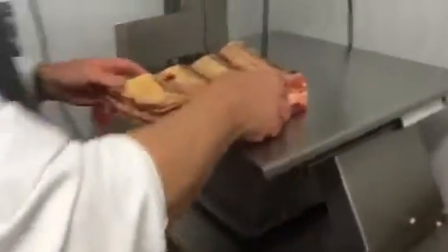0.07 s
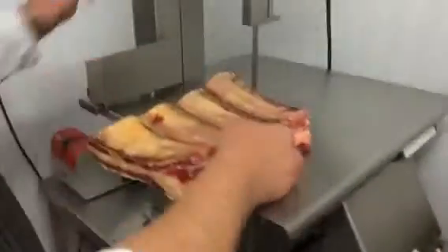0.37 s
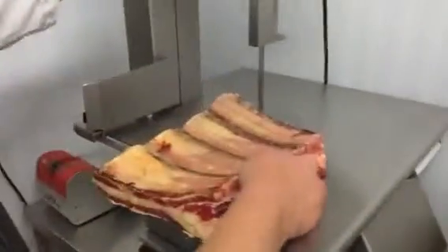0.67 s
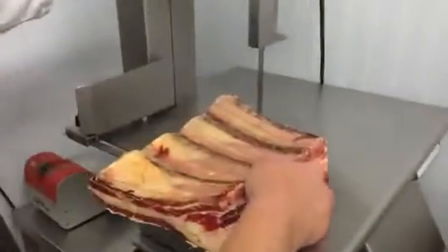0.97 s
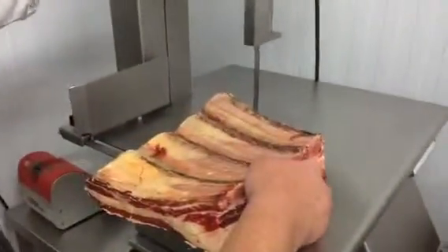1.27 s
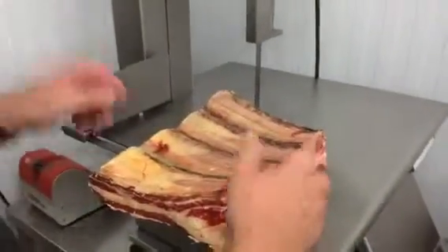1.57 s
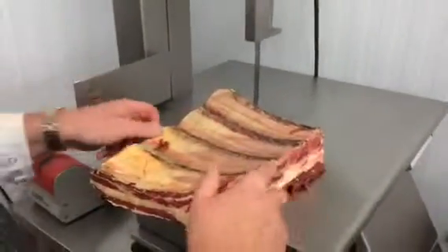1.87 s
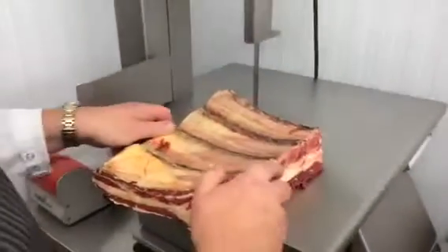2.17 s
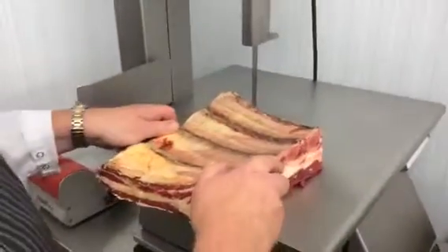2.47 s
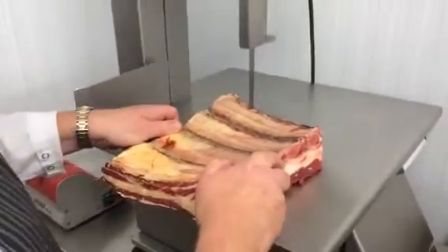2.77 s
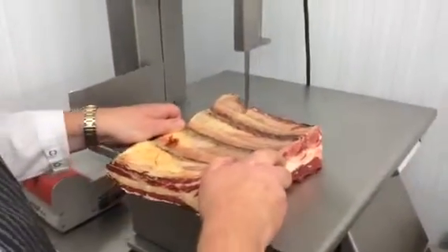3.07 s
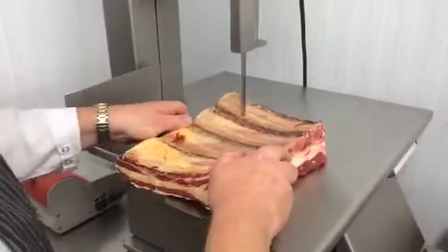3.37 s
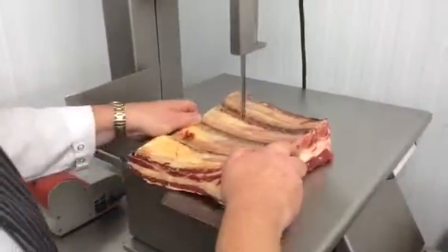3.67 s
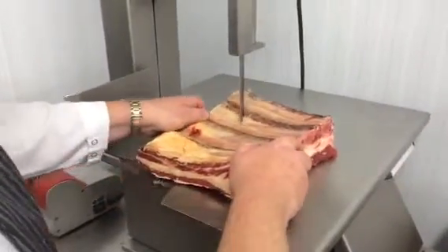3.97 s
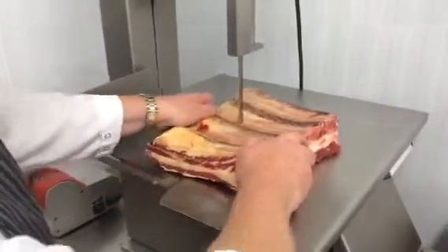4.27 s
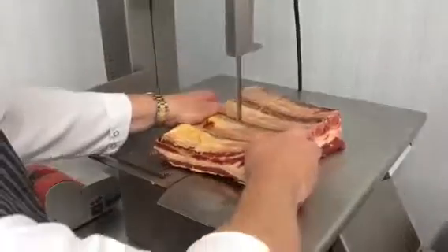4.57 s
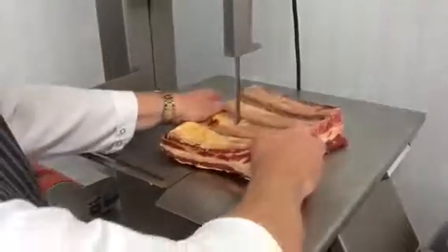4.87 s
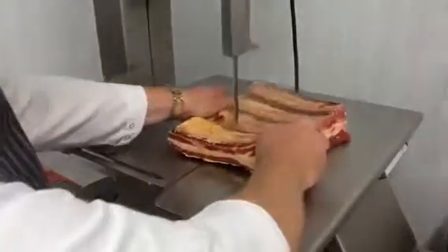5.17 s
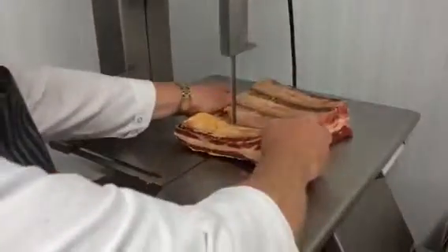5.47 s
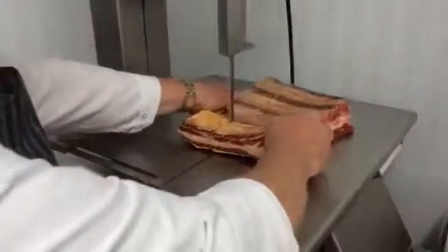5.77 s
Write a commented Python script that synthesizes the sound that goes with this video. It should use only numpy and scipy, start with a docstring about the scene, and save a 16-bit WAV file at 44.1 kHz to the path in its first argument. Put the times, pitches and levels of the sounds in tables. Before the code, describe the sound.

After a few soft knocks, a meat bandsaw starts up and saws through rib bones with a harsh rasp and high squeals.

```python
"""A butcher's bandsaw in a small hard-walled room, heard from close by. A cooling unit hums while a sleeve
brushes the meat and a rack of ribs knocks on the steel table. The starter clacks in, the motor runs up,
and the band shakes the sheet-steel frame, rattles the covers and hisses by friction in its guides.
Then the teeth meet the ribs: the band rasps, and stick-slip in the bone makes it squeal, its note
flipping between overtones. Around some squeals the hiss, fizz and weaker overtones dip briefly."""
import sys
import numpy as np
from scipy import signal
from scipy.fft import rfft, irfft, next_fast_len
from scipy.io import wavfile
from scipy.ndimage import uniform_filter1d

SR = 44100
rng = np.random.default_rng(int(sys.argv[2]) if len(sys.argv) > 2 else 0)


def persist_wave(psi):
    """Save psi, clipped to +-1, as 16-bit WAV."""
    counts = np.round(np.clip(psi, -1, 1) * 32767).astype(np.int16)
    wavfile.write(sys.argv[1], SR, np.atleast_2d(counts).T)


N = 265041
T = np.arange(N) / SR
FFT_SIZE = next_fast_len(N, real=True)
FREQ = np.maximum(np.fft.rfftfreq(FFT_SIZE, 1 / SR), 1)

# tones of the cooling unit's compressor: pitch_hz, relative_db
COMPRESSOR_TONES = [(48.4, -52.5), (70.0, -57.5), (102.3, -58.5), (166.9, -54), (199.2, -59)]
# spectrum of its fan: frequency_hz, gain_db
FAN_SPECTRUM = [(25, -24), (45, -10.5), (80, 2.5), (135, 2), (220, -9.5), (320, -8), (460, -15),
                (580, -18.5), (700, -17.5), (1400, -20), (3000, -27.5), (8000, -40.5), (15000, -50)]
# meat and hands striking the table: start_s, level_db, rise_s, t60_s, tilt_db_per_octave, ring_hz
TABLE_KNOCKS = [(.212, -39, 0.0014, 0.22, -2, 850), (.243, -51, .002, .25, 3.5, 2400),
                (.296, -49, .003, .07, 0.5, 1520), (.724, -45, 0.0018, .12, -2.5, 3220),
                (.735, -45, .004, 0.3, -7.5, 596), (.801, -45, 0.0015, .2, -1.5, 600),
                (.825, -50, 0.011, 0.84, -2, 1560)]
# resonances of the loaded table: centre_hz, width_hz, gain_db
TABLE_MODES = [(343, 200, 1.5), (585, 140, -0.5), (930, 470, -9.5), (1320, 600, -3), (2270, 600, -8),
               (4500, 6500, -14.5), (9000, 8000, -32)]
# button, contactor and armature: start_s, level_db, rise_s, t60_s, tilt_db_per_octave, ring_hz
STARTER_CLACKS = [(1.192, -31, 0.0036, .12, -1, 1190), (1.205, -16, 0.01, 0.13, 0, 2150),
                  (1.238, -13.5, 0.0042, 0.12, 2.5, 1240)]
# resonances of the starter box: centre_hz, width_hz, gain_db
STARTER_BOX_MODES = [(272, 140, -2), (613, 210, -4), (1200, 190, 5.5), (1450, 280, -5), (2060, 1300, -5),
                     (3250, 1000, -7), (4960, 630, -10.5), (6900, 8100, -18.5)]
# belt taking up, then ribs bumping: start_s, level_db, rise_s, t60_s, tilt_db_per_octave, ring_hz
STAND_THUMPS = [(1.38, -35, 0.022, 0.57, 8, 60), (3.28, -31, 0.016, 0.14, 9, 171),
                (4.9, -25, 0.017, 0.2, 9, 76)]
# low resonances of the stand: centre_hz, width_hz, gain_db
STAND_MODES = [(59, 21, -5), (112, 130, -21)]
# the motor running up and settling: time_s, shaft_hz, level_db
MOTOR_RUN = [(1.23, 29.3, -27.5), (1.35, 31.6, -31), (1.55, 43.2, -29.5), (1.78, 47, -31.5),
             (2.0, 48.4, -32.5), (2.5, 44.3, -39.5), (6.0, 38, -75)]
# harmonics of the shaft rate: multiple, relative_db
MOTOR_ORDERS = [(5, -6), (8, 6.5), (10, -6), (13, 2), (15, -6.5), (20, 2), (28, 0.5)]
# broad resonances of frame and table: centre_hz, width_hz, gain_db
FRAME_MODES = [(136, 92, -28), (288, 188, 0.5), (417, 130, 0), (490, 70, -5), (558, 110, 1), (705, 43, -14)]
# broad resonances of the wheel covers: centre_hz, width_hz, gain_db
COVER_MODES = [(854, 142, -1), (1023, 154, 1.5), (1160, 240, -3), (1358, 90, 6), (1556, 125, -0.5),
               (1724, 320, -5), (2320, 380, -6), (3480, 950, -11.5)]
# narrow resonances of the housing: centre_hz, gain_db
HOUSING_MODES = [(121.4, -10), (189.3, -9), (242.3, -2.5), (281.2, 0.5), (332.5, -8), (362.4, -3),
                 (387.1, -1), (411.1, -13.5), (463.4, -31.5), (486.8, -4), (510.6, -13), (567.1, -15),
                 (611.8, -2), (684.5, -5), (726.3, -8), (854.7, -7.5), (892.9, -6.5), (932.0, -3.5),
                 (973.5, -13.5), (1044.7, -7.5), (1098.9, -14), (1146.6, -19.5), (1228.5, -8), (1349.7, -5),
                 (1624.3, -37), (1687.5, -9)]
# spectrum of the band rubbing in guides and scrapers: frequency_hz, gain_db
FRICTION_SPECTRUM = [(600, -13), (1800, 1.5), (2700, 1.5), (3600, 5), (4300, 3), (4800, 0.5), (7000, -0.5),
                     (9000, -2), (11300, -3), (12900, -5), (15500, -10)]
# peaks in the sharp fizz of the teeth: centre_hz, width_hz, gain_db
TOOTH_FIZZ_PEAKS = [(13730, 750, 6), (14600, 1100, -4), (15100, 600, 0)]
# resonances of the free steel band: centre_hz, width_hz, gain_db
BAND_MODES = [(3557, 56, 12.5), (4250, 140, 8.5), (7400, 200, 2), (11350, 410, 2), (14100, 210, 7),
              (13700, 290, -6)]
# teeth biting the hard shell of a rib: start_s, length_s, rasp_change_db, rattle_change_db
BONE_BITES = [(2.86, 0.28, 3, -3), (3.835, 0.19, 1.5, 1), (5, 0.11, 1.5, 1)]
# brief dips in the hiss, fizz and overtones around the squeals: start_s, length_s, depth_fraction
FIZZ_DIPS = [(3.413, 0.2, 0.4), (4.248, 0.25, 1), (5.271, 0.23, 0.9)]
# fundamental of the band, sagging under load: time_s, pitch_hz
BAND_PITCH = [(2.7, 1690), (2.92, 1689), (3.65, 1677), (3.66, 1678), (4.37, 1684), (4.58, 1682),
              (5.45, 1682), (5.51, 1693), (5.85, 1681)]
# steady singing of the leading second partial: time_s, level_db
LEAD_LEVELS = [(2.6, -60), (3.03, -27), (3.6, -29.5), (4.1, -25), (4.65, -36.5), (5.15, -34), (5.45, -41),
               (5.75, -33.5), (6.0, -44)]
# weaker partials that sing along: multiple, level_db
WEAK_PARTIALS = [(1, -47), (3, -47), (4, -39.5), (5, -44), (6, -42.5), (7, -43), (8, -46), (9, -39)]
# squeals in which one partial surges for a moment: start_s, length_s, multiple, level_db
SQUEAL_BURSTS = [(2.68, 0.027, 2, -32), (2.77, 0.043, 9, -24), (2.812, 0.075, 6, -33), (2.92, .11, 4, -26),
                 (3.016, 0.036, 2, -30), (3.11, .04, 2, -26), (3.36, 0.036, 2, -20), (3.358, 0.06, 4, -32),
                 (3.442, 0.062, 2, -17), (3.5, 0.037, 4, -32), (3.99, 0.1, 2, -23), (4.117, .04, 9, -37),
                 (4.312, .11, 2, -25), (4.485, 0.067, 2, -28.5), (4.49, 0.085, 4, -34.5),
                 (4.547, .18, 9, -33), (4.797, 0.04, 2, -32), (5.062, .09, 2, -34.5),
                 (5.153, 0.055, 6, -34), (5.19, .08, 4, -36), (5.251, 0.1, 2, -29.5),
                 (5.318, 0.044, 6, -36), (5.409, 0.039, 6, -30.5), (5.404, 0.027, 2, -32),
                 (5.557, 0.024, 2, -31), (5.69, 0.17, 2, -32)]

START_S, CUT_S, FIRST_BITE_S = 1.21, 2.4, BONE_BITES[0][0]  # saw starts, teeth meet ribs, bone is bitten


def undb(db):
    """Amplitude ratio of a level in decibels."""
    return 10 ** (np.asarray(db) / 20)


def unit(x):
    """Normalisation to rms 1."""
    return x / np.sqrt(np.mean(x ** 2))


def curves(rows):
    """Linear interpolation in time of each column of a timed table."""
    times_s, *columns = np.transpose(rows)
    return [np.interp(T, times_s, column) for column in columns]


def ramp(start_s, length_s):
    """Linear rise from 0 to 1."""
    return np.clip((T - start_s) / length_s, 0, 1)


def swell(start_s, length_s, rise_s, fall_s):
    """Attack-release envelope whose fall begins length_s after the start."""
    return ramp(start_s, rise_s) * (1 - ramp(start_s + length_s, fall_s))


def noise():
    """Gaussian white noise."""
    return rng.standard_normal(N)


def wander(rate_hz):
    """Low-pass noise: a smooth fluctuation of rms 1 that turns about rate_hz times a second."""
    size = max(int(SR / rate_hz), 2)
    smoothed = uniform_filter1d(noise(), size, mode="wrap")
    return unit(uniform_filter1d(smoothed, size // 2, mode="wrap"))


def impacts(per_s, scatter_db):
    """Shot noise: dense tiny blows of uneven strength."""
    hits = rng.random(N) < per_s / SR
    return unit(hits * noise() * undb(scatter_db * noise()))


def colour(x, gain):
    """Filtering by multiplication of the spectrum; the result has rms 1."""
    return unit(irfft(rfft(x, FFT_SIZE) * gain, FFT_SIZE)[:N])


def spectrum(points):
    """Frequency response interpolated on logarithmic axes."""
    hz, db = np.transpose(points)
    return undb(np.interp(np.log(FREQ), np.log(hz), db))


def resonances(modes):
    """Frequency response of steep-sided resonances whose powers add."""
    powers = (undb(2 * db) / (1 + ((FREQ - hz ** 2 / FREQ) / width_hz) ** 2) ** 2
              for hz, width_hz, db in modes)
    return np.sqrt(sum(powers))


def walls(x, wet_db, t60_s):
    """Reverberation: close tiled walls return dense reflections that decay exponentially."""
    echo = noise() * undb(-60 * T / t60_s) * (T > .003)
    wet = signal.fftconvolve(x, echo[:SR // 2] / np.linalg.norm(echo))[:N]
    return (x + undb(wet_db) * wet) / np.hypot(1, undb(wet_db))


def blows(rows, modes, tail_db, tail_t60_s, accent):
    """Impact excitation: a struck body rings down exponentially and leaves a tail in the room."""
    body, out = resonances(modes), 0
    for start_s, level_db, rise_s, t60_s, tilt_db, ring_hz in rows:
        age_s = np.maximum(T - start_s - rise_s, 0)
        decay = np.hypot(undb(-60 * age_s / t60_s), undb(tail_db - 60 * age_s / tail_t60_s))
        # the place that is struck favours one resonance
        favoured = 1 + accent * resonances([(ring_hz, ring_hz / 5, 0)])
        ring = colour(noise(), body * favoured * undb(tilt_db * np.log2(FREQ)))
        out = out + undb(level_db) * ramp(start_s, rise_s) * decay * ring
    return out


def cooler():
    """Superposition of wavering compressor tones and broadband fan noise."""
    hum = sum(undb(db + 2 * wander(3.7)) * np.sin(2 * np.pi * hz * T + wander(2.1))
              for hz, db in COMPRESSOR_TONES)
    rush = colour(noise(), spectrum(FAN_SPECTRUM))
    sink_db = -3.5 * ramp(0.97, 0.62)  # both sink back as the saw starts
    return (undb(-44.5) * unit(hum) + undb(-48) * rush) * undb(sink_db)


def handling():
    """Impacts excite the modes of the table; the friction of a sleeve on meat adds a faint hiss."""
    knocks = blows(TABLE_KNOCKS, TABLE_MODES, tail_db=-8.5, tail_t60_s=0.71, accent=1.9)
    cloth = colour(impacts(per_s=9000, scatter_db=-1), resonances([(7000, 15000, 0)]))
    return knocks + cloth * undb(-68 + 0.88 * wander(9)) * (1 - ramp(0.73, 0.25))


def starter():
    """Impacts of button, contactor and armature excite the modes of the starter box."""
    return blows(STARTER_CLACKS, STARTER_BOX_MODES, tail_db=-16.5, tail_t60_s=0.54, accent=0.77)


def stand():
    """Damped free vibration: the stand shudders as the belt takes up and the ribs bump."""
    return blows(STAND_THUMPS, STAND_MODES, tail_db=-31, tail_t60_s=0.34, accent=1.5)


def motor():
    """Rotational harmonics glide with the shaft rate and flutter with the belt."""
    shaft_hz, level_db = curves(MOTOR_RUN)
    phase = 2 * np.pi * np.cumsum(shaft_hz * (1 + 0.0033 * wander(18.7))) / SR
    orders = sum(undb(db + 2.7 * wander(24)) * np.sin(multiple * phase + .5 * wander(76))
                 for multiple, db in MOTOR_ORDERS)
    return unit(orders) * undb(level_db)


def saw_body(rumble_db, rattle_db):
    """Forced vibration: wheels and band shake the frame, rattle the covers and ring the housing."""
    rumble = colour(impacts(per_s=1100, scatter_db=4), resonances(FRAME_MODES)) * undb(rumble_db)
    rattle = colour(impacts(per_s=2600, scatter_db=0.5), resonances(COVER_MODES)) * undb(rattle_db)
    housing = resonances([(hz, 7 + hz / 180, db) for hz, db in HOUSING_MODES])
    # the housing stores energy, so its ring follows the drive only half way
    ring_db = -32 + (rumble_db - np.median(rumble_db)) / 2
    ring = colour(noise(), housing) * undb(ring_db) * ramp(START_S, 0.19)
    return rumble + walls(rattle, wet_db=-2.5, t60_s=0.42) + ring


def cutting_load():
    """Mechanical loading: contact with bone changes the levels of the rasp and the rattle."""
    # the rasp grows as the teeth enter and fades as the band sinks in
    rasp_db = 3.5 * ramp(CUT_S, 0.73) - 0.9 * np.maximum(T - FIRST_BITE_S, 0)
    rattle_db = 0
    for start_s, length_s, rasp_change_db, rattle_change_db in BONE_BITES:
        contact = swell(start_s, length_s, rise_s=0.069, fall_s=0.29)
        rasp_db = rasp_db + rasp_change_db * contact
        rattle_db = rattle_db + rattle_change_db * contact
    return rasp_db, rattle_db


def fizz_dip():
    """Amplitude modulation: the depth, 0 to 1, of brief dips in the hiss, fizz and weaker overtones."""
    dip = sum(depth * swell(start_s, length_s, rise_s=0.17, fall_s=0.088)
              for start_s, length_s, depth in FIZZ_DIPS)
    return np.clip(dip, 0, 1)


def band_scrape(hiss_db, sizzle_db):
    """Sliding friction in guides and bone makes broadband noise, a little louder once a wheel turn."""
    wheel_hz = 7.7
    wobble = undb(0.19 * np.sin(2 * np.pi * wheel_hz * T) + 0.93 * wander(54))
    hiss = colour(impacts(per_s=18000, scatter_db=-1.6), spectrum(FRICTION_SPECTRUM)) * undb(hiss_db)
    fizz = colour(noise(), resonances(TOOTH_FIZZ_PEAKS)) * undb(sizzle_db - 0.5)
    # the ring of the free band is damped as it enters the cut
    ring = colour(noise(), resonances(BAND_MODES)) * undb(sizzle_db - 5 - 10 * ramp(CUT_S, 0.55))
    return walls(wobble * (hiss + fizz + ring), wet_db=-10, t60_s=0.25)


def partial_amplitude(multiple, steady_db):
    """Addition of powers: a partial's steady singing combines with its squeals."""
    bursts = sum(undb(db) * swell(start_s, length_s, rise_s=0.02, fall_s=0.03)
                 for start_s, length_s, squealing, db in SQUEAL_BURSTS if squealing == multiple)
    return np.hypot(undb(steady_db), bursts)


def band_squeal(dip):
    """Stick-slip oscillation in the bone: one clear harmonic leads while the others flutter roughly."""
    lead_db, = curves(LEAD_LEVELS)
    pitch_hz, = curves(BAND_PITCH)
    phase = 2 * np.pi * np.cumsum(pitch_hz * (1 + 0.00132 * wander(164))) / SR
    lead = partial_amplitude(2, lead_db + 2.5 * wander(13)) * undb(1.46 * wander(140))
    out = np.sqrt(2) * lead * np.sin(2 * phase)
    drop_db = -4.5 * dip - 0.03 * np.maximum(T - CUT_S, 0)
    for multiple, db in WEAK_PARTIALS:
        tone = np.sin(multiple * phase + 0.54 * wander(222.4))
        rough_tone = unit(tone * undb(2.6 * wander(110)))
        flare_db = 3.2 * wander(7)
        out = out + partial_amplitude(multiple, db + drop_db + flare_db) * rough_tone
    return out * ramp(CUT_S, 0.3)


def scene():
    """Superposition at one point: the saw starts, settles and cuts over the sounds of the room."""
    slow = 1 - ramp(START_S, 0.2)  # the wheels are still gathering speed
    shake = swell(1.31, 0.45, rise_s=0.3, fall_s=0.51)  # the slack band shakes the whole saw
    growl = swell(2.1, 0.066, rise_s=0.031, fall_s=0.041)  # the frame settles
    sunk = ramp(FIRST_BITE_S, 0.7)  # the band sinks into the rack
    rasp_db, bone_rattle_db = cutting_load()
    dip = fizz_dip()
    rumble_db = -34.5 + 4.5 * shake + 6.5 * growl + 0.6 * wander(7.1)
    rattle_db = -29 - 9 * slow + 3 * shake + bone_rattle_db
    hiss_db = -29.8 - 5 * slow + 4 * shake + rasp_db - 2.5 * dip
    sizzle_db = -31 - 13 * slow - 4.5 * sunk - 9 * dip + 1.3 * wander(18)
    saw = motor() + saw_body(rumble_db, rattle_db) + band_scrape(hiss_db, sizzle_db)
    switched_on = ramp(START_S - .02, 0.06)
    mono = saw * switched_on + starter() + handling() + stand() + band_squeal(dip) + cooler()
    return np.array([mono, mono])


def record(dry):
    """Saturation and band limiting: the microphone rounds peaks and cuts the deepest bass and the top."""
    ceiling, bottom_hz, top_hz = 0.41, 40, 15280
    rounded = dry / (1 + np.abs(dry / ceiling) ** 6) ** (1 / 6)
    high_pass = signal.butter(6, bottom_hz, "high", fs=SR, output="sos")
    low_pass = signal.ellip(14, .1, 90, top_hz, fs=SR, output="sos")
    return signal.sosfilt(low_pass, signal.sosfilt(high_pass, rounded))


dry = scene()
out = record(dry)
persist_wave(out)
```